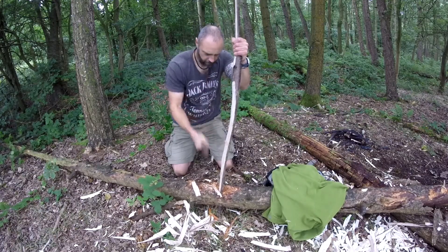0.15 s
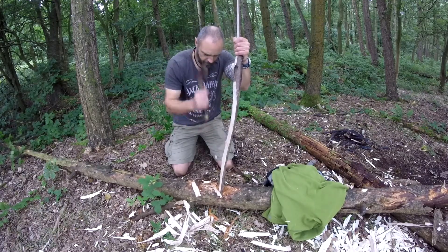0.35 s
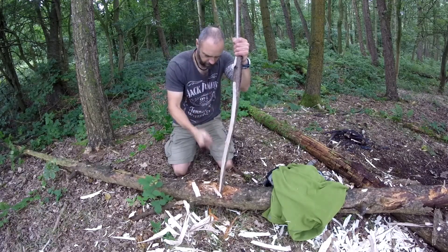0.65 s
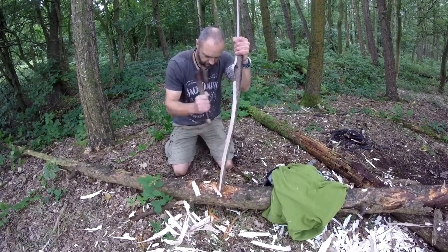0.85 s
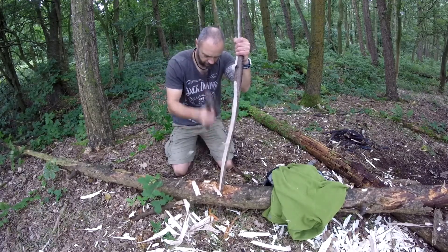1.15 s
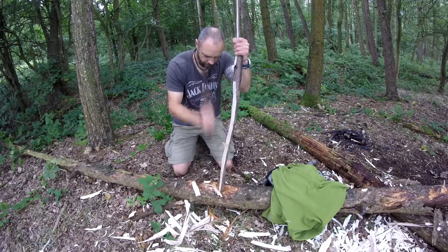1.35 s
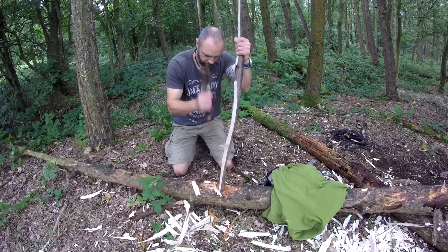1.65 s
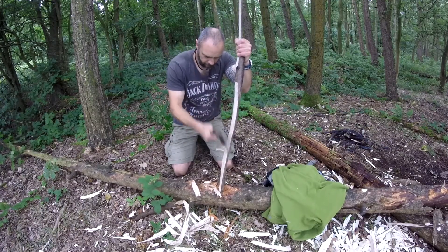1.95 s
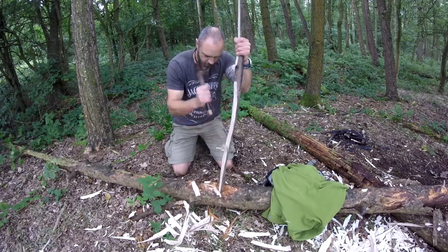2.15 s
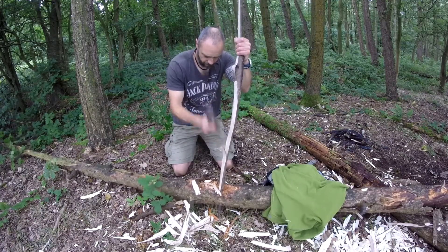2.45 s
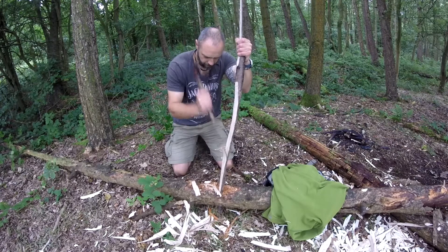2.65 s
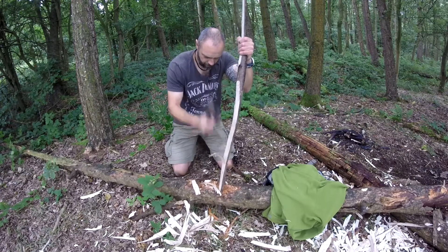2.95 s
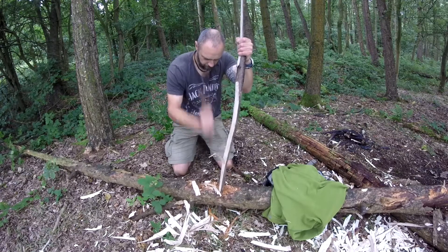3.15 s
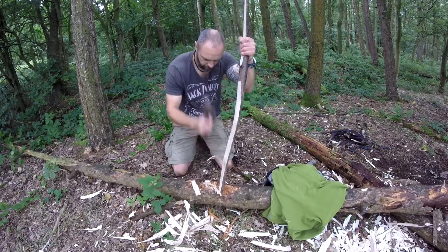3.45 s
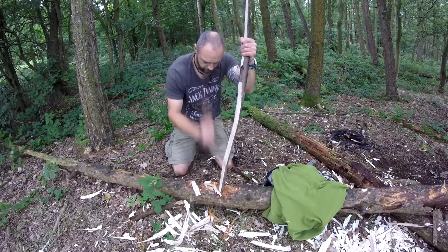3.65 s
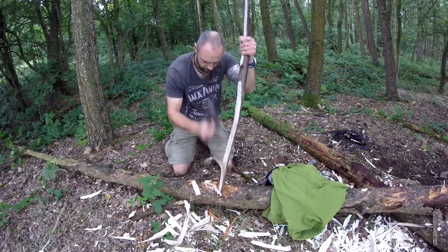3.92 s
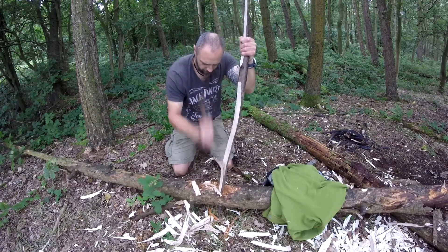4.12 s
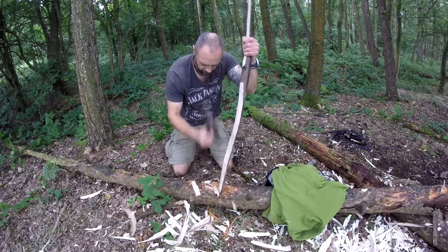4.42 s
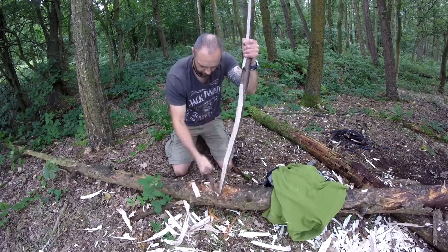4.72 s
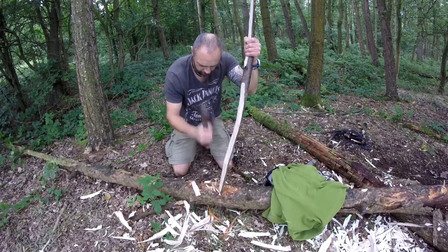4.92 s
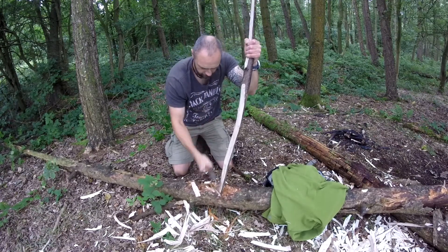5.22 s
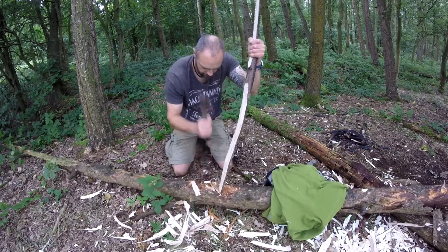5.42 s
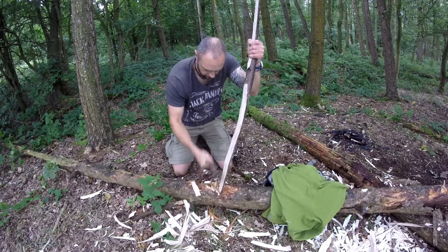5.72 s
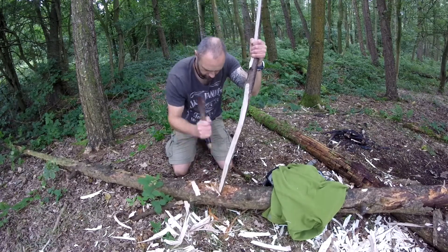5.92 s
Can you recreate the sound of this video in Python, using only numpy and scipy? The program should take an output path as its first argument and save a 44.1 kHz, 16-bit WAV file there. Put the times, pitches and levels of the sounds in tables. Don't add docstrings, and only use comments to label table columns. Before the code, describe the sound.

Low far-off traffic hum and tyre roar open alone for a moment, then a hatchet trims a thin upright stave on a fallen log, about two blows a second. Each blow is a sharp woody crack with tearing fibres and a faint steel ring, often followed by a dull log thud. Some scrape along the grain; a few chips patter down. Close small microphone outdoors, trunks scattering each blow briefly.

```python
import sys
import numpy as np
from scipy import signal
from scipy.fft import rfft, irfft
from scipy.io import wavfile
from scipy.ndimage import uniform_filter1d

SR = 44100
rng = np.random.default_rng(int(sys.argv[2]) if len(sys.argv) > 2 else 0)


def gain_from_db(level_db):
    decades = np.asarray(level_db, float) / 20
    return 10 ** decades


def wav_out(sig):
    wavfile.write(sys.argv[1], SR, np.round(np.clip(np.atleast_2d(sig).T, -1, 1) * 32767).astype(np.int16))


N = 268128


def read(points, hz):
    f, value = np.transpose(points)
    return np.interp(np.log(hz + 1), np.log(f + 1), value)


def add(mix, s, sound):
    part = mix[round(s * SR):][:len(sound)]
    part += sound[:len(part)]


def peaked(x):
    return x / np.max(abs(x))


def band(x, lo_hz, hi_hz):
    return signal.sosfilt(signal.butter(2, [lo_hz, hi_hz], "band", fs=SR, output="sos"), x)


def highpass(x, hz):
    return signal.sosfilt(signal.butter(2, hz, "high", fs=SR, output="sos"), x)


def modes(table, seconds, spread_db=0., detune=0.):
    hz, db, t60 = np.transpose(table)[:, :, None]
    luck = rng.standard_normal((2, len(table), 1))
    t = np.arange(round(seconds * SR)) / SR
    level = gain_from_db(db + spread_db * luck[0] - 60 * t / t60)
    ring = level * np.sin(2 * np.pi * hz * (1 + detune * luck[1]) * t)
    return ring.sum(axis=0)


# (f/Hz, level/dB per Hz)
ROAD_COLOUR = [(14, -34), (22, -8.5), (55, 1.5), (113, -14.5), (248, -17.5), (410, -17), (607, -13),
               (802, -11), (1150, -25), (2200, -33.5), (2700, -42.5), (9000, -55.5), (13500, -67),
               (16000, -65)]
# (t/s, level/dB)
TRAFFIC = [(0.0, 1.5), (.7, -1), (2.1, -2.5), (2.44, -1.5), (2.74, -1.5), (3.1, -0.5), (4.2, -0.5),
           (5.06, 0.5), (5.33, 1), (5.6, 1.5), (6.08, 1.5)]
# (t/s, level at the top/dB, half-length/s)
LORRIES = [
    (.3, 1, 0.45),
    (1.234, 4.5, 0.22),
    (1.59, 2, 0.074),
    (2.067, 2.5, 0.17),
    (2.757, 4.5, 0.16),
    (3.2, 4, .3),
    (3.8, 3, 0.18),
    (4.8, 3.5, .25),
    (5.9, 3.5, 0.26),
]


def road():
    frames, hz = N // 512 + 5, np.fft.rfftfreq(2048, 1 / SR)
    a, b, patches = rng.standard_normal((frames, 1025, 3)).T
    patches = uniform_filter1d(uniform_filter1d(patches, 14, 0), 8, 1)
    t = np.arange(frames) * 512 / SR
    hum_share = 1 / (1 + (hz[:, None] / 160) ** 4)
    roar_share = (1 - hum_share) / (1 + (hz[:, None] / 2600) ** 4)
    hum_db = sum(db * np.exp(-((t - s) / half_s) ** 2) for s, db, half_s in LORRIES)
    roar_db = np.interp(t, *np.transpose(TRAFFIC))
    drift_db = hum_share * (hum_db - hum_db.mean()) + roar_share * roar_db
    patch_db = 0.72 * patches / patches.std()
    z = (a + 1j * b) * gain_from_db(read(ROAD_COLOUR, hz)[:, None] + drift_db + patch_db)
    wash = signal.istft(z, nperseg=2048, noverlap=1536)[1][:N]
    return gain_from_db(-37) * wash / wash.std()


# (f/Hz, t60/s)
TRUNK_DECAY = [(200, 0.11), (1000, 0.12), (2000, 0.33), (3500, 0.39), (7000, 0.38), (11000, 0.33),
               (15000, 0.33)]
# (f/Hz, level re direct/dB)
TRUNK_COLOUR = [(150, -18), (600, -6), (2000, -15), (3500, -10.5), (5000, -11.5), (6500, -5.5),
                (10000, -5.5), (15000, -4)]


def trunks(x):
    hz, frames, z = signal.stft(x, SR, nperseg=256, noverlap=192)
    power = uniform_filter1d(abs(z) ** 2, size=3, axis=0)
    t = frames[:350]
    build_up = (1 - np.exp(-(t / .0105) ** 2)) ** 2
    decay_db = read(TRUNK_COLOUR, hz)[:, None] - 60 * t / read(TRUNK_DECAY, hz)[:, None]
    decay = gain_from_db(decay_db) ** 2 * build_up / 8
    heard = abs(signal.fftconvolve(power, decay, axes=1)[:, :len(frames)])
    a, b = rng.standard_normal((len(frames), len(hz), 2)).T
    return signal.istft((a + 1j * b) * np.sqrt(heard), SR, nperseg=256, noverlap=192)[1][:N]


# (t/s, peak level/dB, f/Hz, t60/s)
CHIPS = [(.3001, -35, 3000, .006), (.3003, -45, 6500, .003), (.3496, -31, 2500, .022),
         (.3503, -20.5, 1100, .06), (.351, -24, 1530, .07), (.779, -45, 6700, .01), (1.561, -31, 1500, .01),
         (4.575, -48, 5500, .012), (4.587, -50, 6000, .008), (4.665, -50, 6000, .008),
         (4.731, -49, 5500, .01), (5.113, -43, 2700, .008), (5.378, -45, 5000, .006),
         (5.4105, -46, 4300, .008), (5.411, -46, 6600, .012), (5.861, -45, 6500, .008)]


def chip(peak_db, hz, t60):
    cluster = [(hz * k, db, t60) for k, db in ((.93, -8), (1, 0), (1.1, -7))]
    tap = modes(cluster, .06, spread_db=2., detune=.01)
    return gain_from_db(peak_db) * peaked(band(tap, hz / 2, hz * 2))


# (f/multiple of the thud's pitch, level/dB, t60/s)
LOG = [(1, -3, 0.067), (1.95, -9, .033), (2.4, 3, 0.038), (1.8, 15, 0.0088)]
# (t/s, peak level/dB, f/Hz, push length/ms)
THUDS = [(.176, -21, 296, 2), (.676, -11.5, 290, 1.1), (1.1265, -9, 330, 1.95), (1.5495, -19, 250, 2.5),
         (1.9845, -9.5, 274, 2.22), (2.437, -9.5, 265, 2.7), (2.8985, -10, 276, 2),
         (3.366, -14.5, 239, 2.9), (3.855, -14, 262, 3.8), (4.3522, 1.5, 261, 1.27), (4.842, -15, 179, 3.1),
         (5.3105, -5.5, 292, 1.7), (5.7798, -1.5, 280, 1.88)]


def thud(peak_db, hz, push_ms):
    rebound_s, rebound_db = 0.01028, -16
    push = np.gradient(np.hanning(round(push_ms * SR / 1000) + 3))
    back = np.gradient(np.hanning(round(2 * push_ms * SR / 1000) + 3))
    gap = np.zeros(max(round(rebound_s * SR) - len(push), 1))
    push = np.r_[push, gap, gain_from_db(rebound_db) * back]
    body = modes([(k * hz, db, t60) for k, db, t60 in LOG], 0.091)
    sway = np.cumsum(body) - np.sum(body) * np.linspace(0, 1, len(body))
    return -gain_from_db(peak_db) * peaked(np.convolve(push, sway))


# (f/Hz, t60/s)
STEEL = [(3300, .14), (3930, .2), (5432, .3), (6420, .16), (9420, .2)]
# (t/s, peak level/dB, f favoured by the point of impact/Hz)
SINGS = [(.171, -44, 3960), (.668, -40, 4380), (1.121, -41, 3960), (1.543, -42, 6500), (1.978, -47, 4440),
         (2.431, -41, 6600), (2.895, -40, 5930), (3.364, -46, 6800), (3.851, -45, 7300), (4.322, -47, 7000),
         (4.807, -43, 7000), (5.277, -39, 5430), (5.752, -50, 4200)]


def sing(peak_db, favoured_hz):
    octaves_away = abs(np.log2(np.transpose(STEEL)[0] / favoured_hz))
    peaks_db = peak_db + np.maximum(-24 * (octaves_away - octaves_away.min()), -12)
    beat_hz = 27.8
    main = [(hz, db - 2, t60) for (hz, t60), db in zip(STEEL, peaks_db)]
    twin = [(hz - beat_hz, db - 3, t60 * .45) for (hz, t60), db in zip(STEEL, peaks_db)]
    ring = modes(main + twin, .3, detune=.001)
    return ring * (1 - np.exp(-np.arange(len(ring)) / SR / 0.0012))


# (t/s, length/ms, rms level/dB, brightness/dB per octave)
SKIDS = [
    (.167, 30, -25, -3),
    (.676, 24, -27.5, -10.5),
    (1.5445, 10.6, -27, -2.5),
    (3.357, 30, -45, 5),
    (3.368, 19, -30.5, -8),
    (4.320, 24, -32, -2),
    (4.3462, 4.5, -26, -1.5),
    (4.814, 30, -36.5, 1.5),
    (5.282, 20, -30.5, -6),
    (5.758, 17, -24, -7.5),
]
# (t/s, length/ms, rms level/dB, brightness/dB per octave)
CRACKS = [
    (0.6688, 4, -30, 1.5),
    (1.1208, 8.5, -16, -10),
    (1.9788, 10, -25, -4.5),
    (2.4304, 6.5, -23.5, -4),
    (2.8938, 6, -32, -11),
    (3.8513, 5.8, -13, -8),
    (4.8071, 5, -26, -5.5),
    (5.276, 5, -29.5, -4),
    (5.7518, 6.6, -14.5, -9),
]


def skid(length_ms, rms_db, tilt_db):
    n = round(length_ms * SR / 1000)
    unevenness_db = 2.6 * uniform_filter1d(rng.exponential(1, 2048), size=40)
    grit = rng.standard_normal(2048) * gain_from_db(unevenness_db)
    hz = np.fft.rfftfreq(2048, 1 / SR)
    slope = gain_from_db(tilt_db * np.log2(1 + (hz / 4000) ** 2))
    bass_loss = hz ** 2 / (hz ** 2 + 900 ** 2)
    top_loss = 1 + (hz / 12200) ** 6
    grit = irfft(rfft(grit) * slope * bass_loss / top_loss)
    easing = gain_from_db(rms_db - 19.4 * np.linspace(0, 1, n))
    return easing * grit[:n] / grit.std() * signal.windows.tukey(n, .3)


# (t/s, low level/dB, low f/Hz, high f/Hz, high level/dB)
NOTES = [(.1703, -12.5, 750, 3950, -31), (.1908, -14.5, 770, 1980, -39), (.6685, -17, 490, 3940, -28),
         (1.1206, -14, 504, 3840, -24), (1.5422, -20, 420, 1320, -24.5), (1.9769, -24, 398, 2580, -30),
         (2.4306, -31, 496, 3930, -25), (2.8947, -27, 445, 3320, -17.5), (3.3636, -17, 753, 2260, -37),
         (3.8509, -18, 776, 3290, -21), (4.331, -40, 484, 2510, -42), (4.807, -13, 770, 3390, -27.5),
         (5.2761, -31, 770, 4320, -37), (5.752, -12.5, 483, 4090, -32)]


def note(low_db, low_hz, high_hz, high_db):
    ring = modes([(low_hz, low_db - 2.0, .035), (high_hz, high_db + 11, .016)], .06)
    return -ring * (1 - np.exp(-np.arange(len(ring)) / SR / 0.00067))


# (f/Hz, level/dB, t60/s)
BENDING = [(330, 3.5, 0.07), (509, 14.5, 0.0148), (770, 13.5, 0.02), (910, -23, 0.017)]
RING = [(1030, -14.5, 0.024), (1339, -8.5, 0.064), (1610, -24, .014), (1890, -1, 0.021), (2012, 13, 0.014),
        (2123, -10, 0.031), (2350, -6, 0.016), (2730, -6, 0.025), (3140, -20.5, 0.0094)]
SPLINTER = [(3000, 2, 0.0051), (4135, 10, 0.032), (4460, 26.5, 0.0036), (5170, 18.5, 0.0066),
            (6300, -18, 0.0068), (6120, 13, 0.007), (7700, -29, 0.0037), (8000, -23, .003),
            (9000, -48, .0025), (10200, -37, .002)]
FIZZ = [(10900, 0, .0012), (12200, -2, .0012), (13400, -2, .0012), (14400, -3, .0012)]
# (t/s, ring peak level/dB, bending level re ring/dB, splinter level re ring/dB, time in the cut/ms)
BITES = [(.1702, -13.5, -1, -4.5, 7.3), (.1907, -24.5, 3.5, -23, 11), (.6685, -15.5, 0.5, -13, 4.1),
         (.6726, -20, -8, -2.5, 6.4), (1.1206, -7, -7.5, -5.5, 10.4), (1.5422, -14, -4, -3.5, 3.8),
         (1.5478, -16.5, 0.5, -31, 6.3), (1.9769, -13, -0.5, -12, 10.2), (2.4306, -9.5, -4, -2.5, 6.5),
         (2.8947, -7, -6.5, -2, 6), (3.3636, -16.5, -0.5, -4.5, 4.8), (3.8509, -9, -6.5, -4.5, 7.1),
         (4.3305, -19, 5.5, -1, 8.4), (4.3505, -20, 3, 1.5, 2.9), (4.8066, -11, -7.5, -10.5, 4.3),
         (4.8123, -19, -0.5, 3.5, 4.5), (4.8348, -24, 4.5, 8, 0.68), (4.8385, -23, 0, -4, 3.8),
         (5.2761, -15, -2.5, -5.5, 5.8), (5.3085, -32.5, 13, 2, 4.9), (5.7518, -15, 2.5, -19, 1.9),
         (5.7552, -21, 7.5, 0, 2.6), (5.7748, -20, -2, -7, 1.1)]


def bite(ring_db, bend_db, splinter_db, cut_ms):
    t = np.arange(1200) / SR
    snaps_per_s = 6000
    snaps = (rng.random(len(t)) < snaps_per_s / SR) * rng.standard_normal(len(t))
    force = 0.33 * snaps * np.exp(-(t * 1000 / np.clip(cut_ms, .5, 15)) ** 2)
    force[0] = -1
    fizz_db = -34 + (0.12 - 1) * ring_db + 0.39 * splinter_db - 4.1 * cut_ms
    parts = [(BENDING, bend_db, 200, 1200), (RING, 0, 900, 3400),
             (SPLINTER, splinter_db, 2800, 11000), (FIZZ, fizz_db, 10000, 16000)]
    wood = 0
    for table, db, lo_hz, hi_hz in parts:
        body = band(modes(table, .06, spread_db=2., detune=.007), lo_hz, hi_hz)
        wood = wood + gain_from_db(db) * peaked(np.convolve(force, body))
    return gain_from_db(ring_db) * wood


def scene():
    blows = np.zeros(N)
    sources = ((CHIPS, chip), (THUDS, thud), (SINGS, sing), (SKIDS, skid), (CRACKS, skid),
               (NOTES, note), (BITES, bite))
    for table, source in sources:
        for s, *row in table:
            add(blows, s, source(*row))
    blows = highpass(blows, 173)
    return (blows + trunks(blows) + road())[None]


def band_limit(x):
    return signal.sosfilt(signal.butter(12, 16370, fs=SR, output="sos"), x)


def record(dry):
    edge = signal.firwin(255, 15200, window=("kaiser", 8), fs=SR)
    mix = signal.oaconvolve(dry, edge[None], "same")
    return band_limit(mix)


dry = scene()
out = record(dry)
wav_out(out)
```